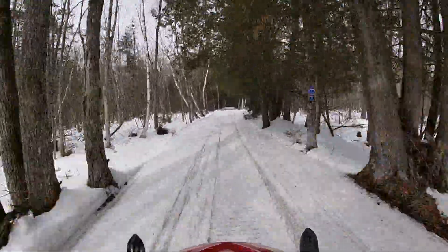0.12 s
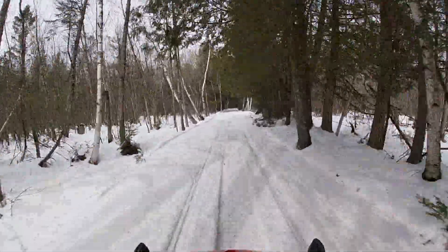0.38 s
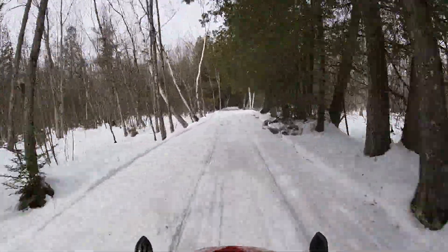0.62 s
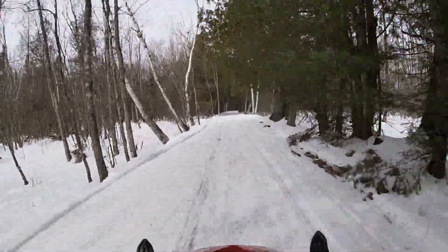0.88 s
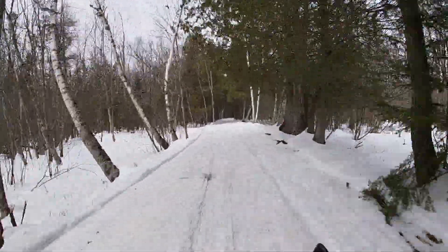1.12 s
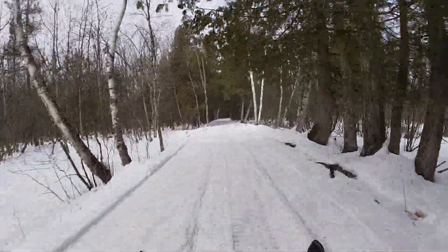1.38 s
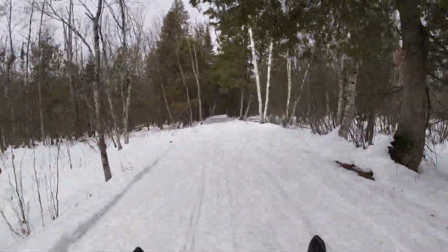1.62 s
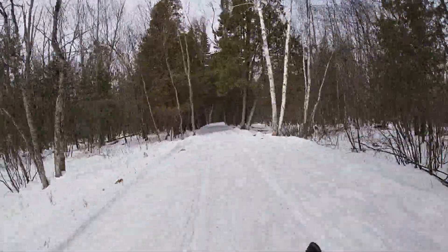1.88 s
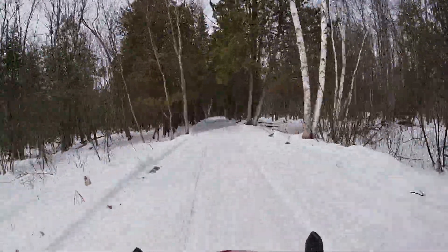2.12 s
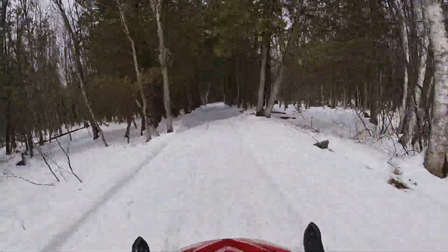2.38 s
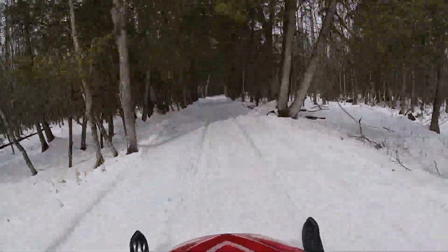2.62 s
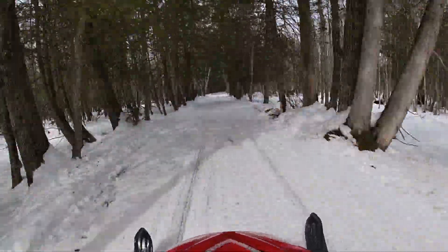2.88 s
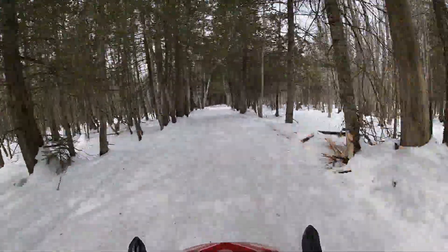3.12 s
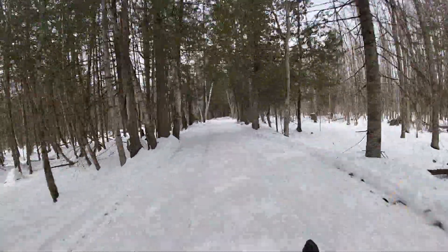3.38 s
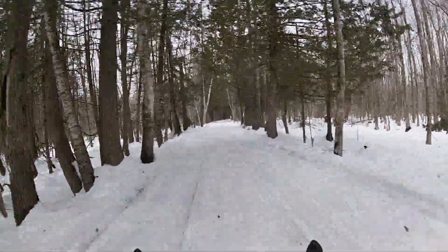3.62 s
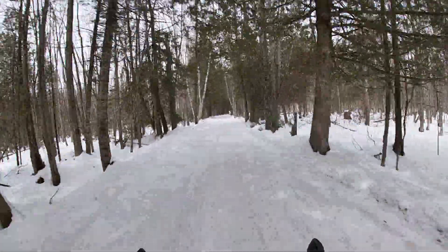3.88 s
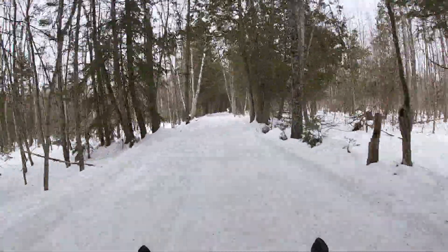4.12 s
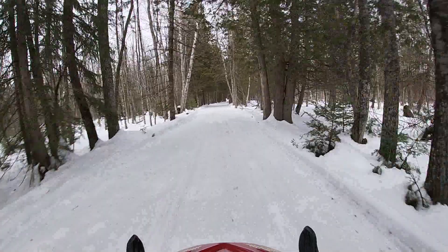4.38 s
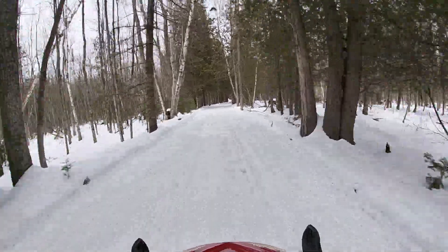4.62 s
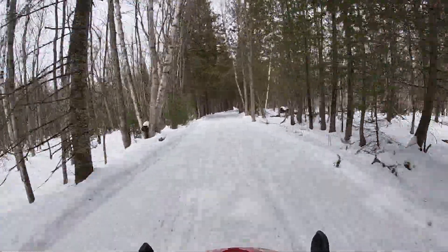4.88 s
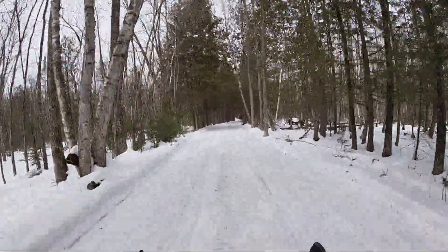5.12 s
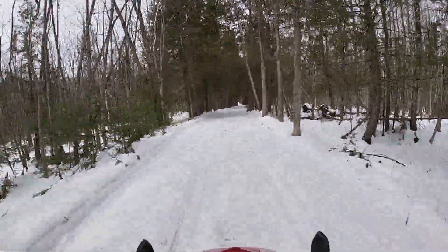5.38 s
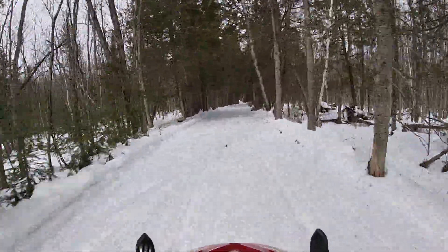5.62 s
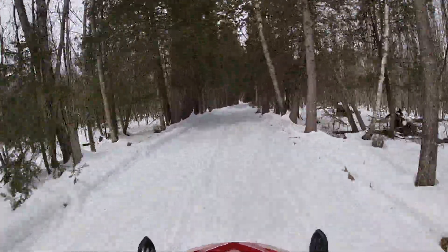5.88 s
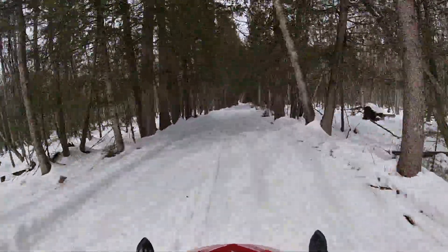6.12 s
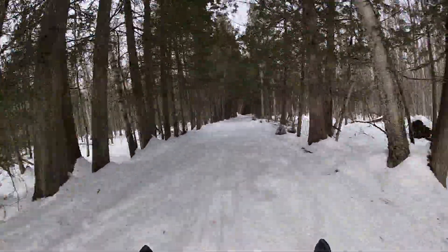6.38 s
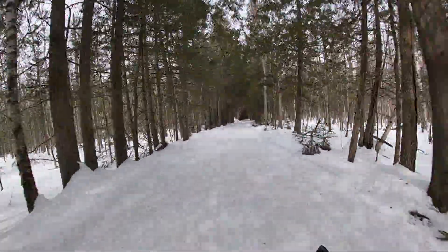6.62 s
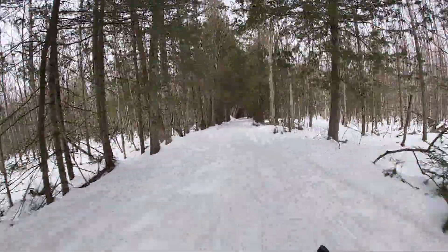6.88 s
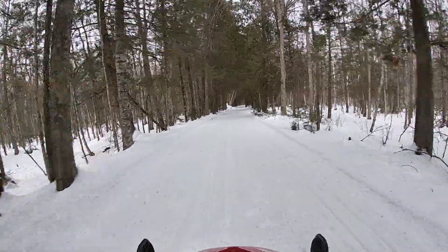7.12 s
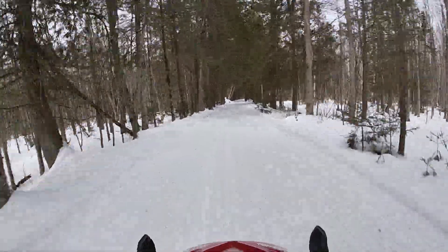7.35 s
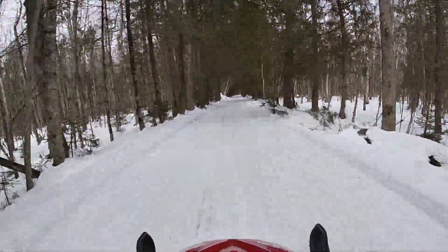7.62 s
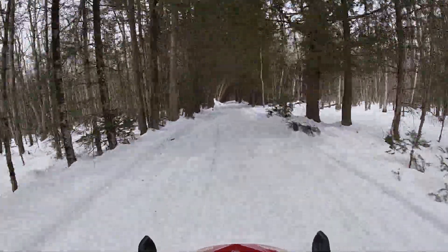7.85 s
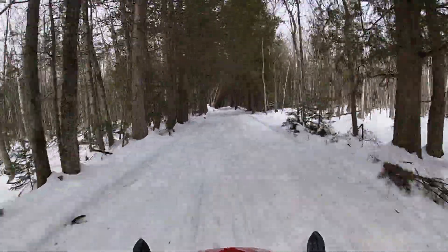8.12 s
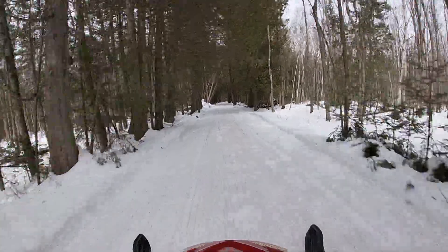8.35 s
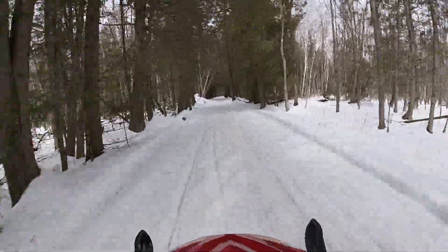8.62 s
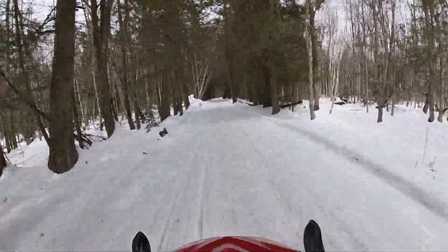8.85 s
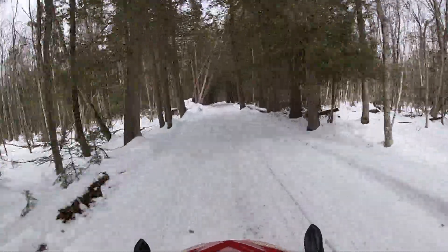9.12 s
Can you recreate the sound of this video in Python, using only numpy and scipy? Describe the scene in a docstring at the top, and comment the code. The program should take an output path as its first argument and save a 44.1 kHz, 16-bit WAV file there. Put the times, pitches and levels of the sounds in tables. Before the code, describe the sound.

Heard from the rider's helmet, a twin two-stroke snowmobile buzzes steadily through snowy woods, pitch easing up and down, sputtering briefly amid track roar and hiss.

```python
"""A droning exhaust that stumbles comes first to the ear: a twin two-stroke snowmobile on a snow trail.
One housed microphone rides at the driver's helmet, so the machine stays at the same close distance.
The exhaust is a sine at two firings a turn plus filtered pulses in which some firings come weak. Sines at
the crank orders sing through the hood's resonances, and a wavering sine is the hum of the track lugs.
Behind them, coloured noise makes the wind buffet, the roar of engine and track, and the hiss of intake and snow."""
import sys
import numpy as np
from scipy import signal
from scipy.fft import rfft, irfft, next_fast_len
from scipy.io import wavfile
from scipy.ndimage import uniform_filter1d, map_coordinates

SR = 44100
rng = np.random.default_rng(int(sys.argv[2]) if len(sys.argv) > 2 else 0)


def materialize(psi):
    """Save the field psi as 16-bit PCM at rate SR to the path in sys.argv[1].

    A 1-D psi becomes a single channel; in a 2-D psi each row is a channel.
    """
    bounded = np.clip(np.atleast_2d(psi).T, -1, 1)
    quanta = np.round(bounded * 32767).astype(np.int16)
    wavfile.write(sys.argv[1], SR, quanta)


def linear_from_db(decibels):
    """Turn decibels (scalar or array-like) into linear amplitude factors; 0 gives 1."""
    return 10 ** (np.asarray(decibels, float) / 20)


N = 407484  # samples

# Wind buffet at the microphone: [t/s, level/dB]
BUFFET_LEVEL = [(0.0, -31), (0.31, -21), (0.62, -32), (0.78, -23), (0.98, -35), (1.31, -24), (1.6, -27),
                (1.95, -31), (2.4, -21.5), (3.3, -31), (3.7, -23), (3.96, -25), (4.5, -23), (5.0, -31),
                (5.4, -20), (5.8, -33), (6.36, -23), (6.9, -28), (7.05, -19), (7.2, -21.5), (8.1, -25.5),
                (8.27, -33), (8.45, -31), (8.85, -34.5), (9.0, -28.5), (9.24, -26)]
# Engine and track roar, intake and snow hiss: [t/s, roar level/dB, hiss level/dB]
AIR_LEVEL = [(0.0, -19, -31), (0.75, -17.5, -30), (0.92, -18.5, -31), (1.14, -16, -27.5),
             (1.25, -16.5, -29), (1.6, -17, -30.5), (1.98, -18.5, -30.5), (2.2, -16.5, -28),
             (2.43, -16, -26), (2.75, -17, -29), (2.98, -17, -29), (3.2, -16.5, -30.5), (3.5, -19.5, -32),
             (3.96, -17.5, -31), (4.43, -17.5, -31.5), (5.0, -19.5, -32), (5.66, -19, -33), (6.1, -17, -31),
             (6.28, -16.5, -29), (6.5, -17, -29.5), (6.74, -18, -28), (7.05, -15, -27.5),
             (7.5, -16.5, -27.5), (8.1, -17.5, -30), (8.48, -19, -30), (8.68, -17, -30), (8.89, -19.5, -31),
             (9.24, -18, -31)]
# Relative spectra of the three noises: [f/Hz, level/dB]
BUFFET_SPECTRUM = [(12, -19), (25, -7.5), (40, -6.5), (65, -4.5), (110, -8), (200, -19.5), (400, -48.5),
                   (1000, -120)]
ROAR_SPECTRUM = [(40, -120), (80, -8.5), (130, 4.5), (200, 7), (250, -3), (296, -2.5), (355, -4),
                 (523, -4.5), (580, -7), (897, -11), (1120, -9), (1360, -14), (1550, -7), (2040, -20),
                 (2400, -23.5), (3120, -53), (5280, -120)]
HISS_SPECTRUM = [(500, -120), (1060, -0.5), (1800, 0.5), (2050, -4), (3000, -4), (4080, -12), (4620, -11),
                 (6040, -13.5), (7350, -25), (8000, -32), (9000, -31), (10000, -35.5), (11000, -44.5),
                 (12600, -51), (13000, -69.5), (14200, -68.5), (16000, -120)]
# Track lugs passing the sprocket: [t/s, lug rate f/Hz, level/dB]
TRACK_HUM = [(0.0, 243, -25), (0.3, 245, -21.5), (0.8, 244, -27), (1.13, 257, -26), (1.6, 243, -33),
             (1.96, 252, -27), (2.25, 255, -32), (2.45, 260, -24), (2.98, 263, -26.5), (3.3, 258, -32),
             (3.5, 260, -27.5), (3.9, 256, -28.5), (4.37, 250, -33.5), (4.63, 246, -22.5),
             (4.89, 247, -18.5), (5.07, 252, -23), (5.4, 244, -31.5), (5.68, 240, -24.5), (6.12, 245, -24),
             (6.27, 244, -27.5), (6.77, 250, -19), (7.0, 252, -28), (7.5, 255, -24.5), (7.85, 258, -29),
             (8.5, 252, -30.5), (8.93, 253, -18), (9.24, 255, -34)]
# Crank speed, in turns per second: [t/s, f/Hz]
CRANK_SPEED = [(0.0, 92.7), (0.2, 91), (0.44, 89.1), (0.67, 90.1), (0.82, 87.65), (0.97, 90.75),
               (1.1, 96.6), (1.2, 92.36), (1.31, 89.33), (1.49, 87.5), (1.7, 85.7), (1.88, 90.04),
               (2.06, 94.3), (2.16, 98), (2.34, 98.5), (2.44, 95.5), (2.6, 91.76), (2.7, 89.9),
               (2.96, 94.8), (3.04, 91.2), (3.22, 86.3), (3.33, 85.46), (3.6, 88.7), (3.73, 85.75),
               (3.86, 85.9), (4.0, 86.95), (4.17, 84.4), (4.4, 81.3), (4.72, 80.23), (4.99, 85.54),
               (5.35, 80.84), (5.51, 79.9), (5.64, 80.86), (5.79, 87.4), (5.93, 88.1), (6.1, 93.3),
               (6.29, 87.95), (6.41, 87.9), (6.59, 93), (6.77, 93.1), (7.0, 94), (7.23, 93), (7.3, 91.5),
               (7.54, 89.9), (7.95, 86.5), (8.12, 85.7), (8.2, 87.44), (8.44, 87.9), (8.6, 92.4),
               (8.67, 92.6), (9.01, 88.9), (9.24, 88.1)]
# Crank orders before resonance and effort: [order, level/dB]
ORDER_LEVEL = [(4, -33), (5, -44), (6, -33.5), (7, -40.5), (8, -42), (9, -45.5), (10, -46.5), (11, -43),
               (12, -42.5), (13, -40), (14, -44), (15, -46.5), (16, -45), (17, -41.5), (18, -41.5),
               (19, -46.5), (20, -45), (21, -48), (22, -52.5), (23, -51), (24, -45)]
# Resonances of hood and silencer: [centre f/Hz, width f/Hz, lift level/dB]
RESONANCES = [(330, 25, 4), (389.6, 25, 9.5), (471.3, 20, 9.5), (528, 50, 6), (655, 30, 5), (747, 110, 6.5),
              (981, 40, 5.5), (1067, 41, 7), (1150.4, 70, 10), (1265, 40, 6), (1452, 22, 4.5),
              (1527, 52, 13), (1552, 23, 3.5), (1684, 45, 10.5)]
# Level change of the whine: [t/s, lower part level/dB, upper part level/dB]
WHINE_LEVEL = [(0.0, 4, 0.5), (0.3, -1, 1), (0.75, 1, 4.5), (1.0, 1.5, 3), (1.4, -0.5, 1), (1.65, 2, -1),
               (1.9, -0.5, 3), (2.25, -1, -1), (2.65, 1, 3), (3.1, -0.5, 0), (3.5, 0, -0.5),
               (3.95, 0.5, 0.5), (4.3, 5, 1), (4.7, 2.5, 2.5), (5.05, 1, -1), (5.3, 4, 3.5), (5.65, -2, 3),
               (6.2, 0, -0.5), (6.6, -0.5, 4.5), (7.0, -1, 0), (7.5, -0.5, 0), (8.0, 0.5, 1),
               (8.5, 1.5, -1), (8.7, -3, 0), (9.0, -2, 1.5), (9.24, -1, 0.5)]
# First crank order of the lower and of the upper part of the whine: [order]
WHINE_FIRST_ORDER = (11, 15)
# Even firing tone between stumbles: [t/s, level/dB]
EXHAUST_LEVEL = [(0.0, -12), (0.35, -10.5), (0.7, -13.5), (0.9, -10), (1.08, -11), (1.13, -15.5),
                 (1.28, -15.5), (1.45, -9.5), (2.02, -11), (2.08, -17), (2.22, -14.5), (2.38, -18),
                 (2.6, -13.5), (2.68, -11), (3.1, -11), (3.3, -9.5), (3.6, -12), (3.95, -13), (4.15, -13),
                 (4.85, -14), (5.05, -10), (5.25, -12), (5.75, -11), (6.15, -13.5), (6.92, -12.5),
                 (7.0, -17), (7.19, -17.5), (7.25, -12.5), (7.9, -12), (8.35, -9.5), (8.75, -11.5),
                 (9.24, -11)]
# Relative colour of an uneven firing in the pipe: [f/Hz, level/dB]
PIPE_SPECTRUM = [(30, -41.5), (62, -3.5), (105, 6), (140, -10.5), (200, -15.5), (240, -16), (300, -26),
                 (420, -61), (900, -120)]
# Stumbles as the throttle eases, timed at half height: [start t/s, length t/s, level/dB]
STUMBLES = [(0.713, 0.12, -19), (1.106, 0.13, -22), (1.414, 0.06, -26), (1.545, 0.23, -15.5),
            (2.05, 0.062, -25), (2.363, 0.34, -25), (2.921, 0.25, -24), (3.247, 0.078, -16.5),
            (3.605, 0.24, -19), (4.128, 0.056, -17.5), (4.247, 0.17, -20.5), (4.417, 0.4, -17.5),
            (5.097, 0.093, -19.5), (5.288, 0.34, -17), (6.05, 0.07, -30), (6.219, 0.17, -17),
            (6.572, 0.066, -23), (7.573, 0.21, -25.5), (7.899, 0.13, -24.5), (8.122, 0.077, -22),
            (8.7, 0.14, -28)]

STUMBLE_EDGE_S, STEADY_UNEVEN_DB = 0.044, -36  # rise and fall; unevenness in steady running
STUMBLE_FULL_DB, TONE_LOSS = -12.5, 0.74  # stumble level at which the tone loses this share
OVERTONE_LOSS = 0.35  # share of the tone's loss in dB that the orders suffer
PULL_DB, PULL_HZ_PER_S = 1.5, 18  # swell of the low orders; speed gain at which it levels off


def unit(x):
    """Scale a signal to rms 1."""
    return x / np.sqrt(np.mean(x ** 2) + 1e-20)


def curves(rows):
    """Draw one value per sample for each column after the time."""
    knot_s, *columns = np.transpose(rows)
    t = np.arange(N) / SR
    return [np.interp(t, knot_s, column) for column in columns]


def wobble(rate):
    """Random curve with straight lines between knots, rate (at most 50) knots a second."""
    knots = rng.standard_normal(int(N * 60 / SR))
    return map_coordinates(knots, [np.arange(N) * min(rate, 50) / SR], order=1)


def coloured(x, spectrum):
    """Filter x through a spectrum, then bring it to rms 1."""
    size = next_fast_len(N + 8192)
    hz, db = np.transpose(spectrum)
    bin_hz = np.fft.rfftfreq(size, 1 / SR)
    gain = linear_from_db(np.interp(np.log(bin_hz + 1), np.log(hz + 1), db))
    return unit(irfft(rfft(x, size) * gain, size)[:N])


def patchy_noise(patchy_db):
    """White noise whose gain varies at random in patches of time and frequency."""
    cells = signal.stft(rng.standard_normal(N), nperseg=512)[2]
    patches = uniform_filter1d(rng.standard_normal(cells.shape), size=8, axis=0)
    patches = uniform_filter1d(patches, size=8, axis=1)
    return signal.istft(cells * linear_from_db(patchy_db * unit(patches)), nperseg=512)[1][:N]


def tone(turns, order):
    """A sine of rms 1 locked to a shaft, from a random phase."""
    return np.sqrt(2) * np.sin(2 * np.pi * (order * turns + rng.random()))


def wind_buffet():
    """Wind against the housed microphone: low noise that swells in gusts."""
    level_db, = curves(BUFFET_LEVEL)
    return linear_from_db(level_db) * coloured(patchy_noise(patchy_db=0.4), BUFFET_SPECTRUM)


def engine_track_roar(level_db):
    """The broad roar of engine and track, as one noise."""
    return linear_from_db(level_db) * coloured(patchy_noise(patchy_db=0.5), ROAR_SPECTRUM)


def intake_snow_hiss(level_db, turns):
    """Hiss of intake and thrown snow, breathing once and twice a crank turn."""
    puff = 1 + 0.019 * np.cos(2 * np.pi * turns) + 0.04 * np.cos(4 * np.pi * turns)
    gusts = linear_from_db(0.52 * wobble(11) + 0.83 * wobble(35))
    noise = coloured(patchy_noise(patchy_db=0.28), HISS_SPECTRUM)
    return linear_from_db(level_db) * gusts * puff * noise


def track_hum():
    """Drive lugs pass the sprocket at a rate set by ground speed; the hum wavers over the bumps."""
    lug_hz, level_db = curves(TRACK_HUM)
    lugs_passed = np.cumsum(lug_hz + 3.5 * wobble(12)) / SR
    return linear_from_db(level_db + 3.1 * wobble(14)) * tone(lugs_passed, order=1)


def stumbling():
    """Strength of the uneven firing: trapezoids on top of a low steady value."""
    t = np.arange(N) / SR
    strength = linear_from_db(STEADY_UNEVEN_DB)
    for start, length, db in STUMBLES:
        inside_s = np.minimum(t - start, start + length - t)  # time to the nearer edge
        strength = strength + linear_from_db(db) * np.clip(inside_s / STUMBLE_EDGE_S + 0.5, 0, 1)
    return strength


def kept(stumble):
    """Share of the even firing that survives a stumble."""
    return np.clip(1 - TONE_LOSS * stumble / linear_from_db(STUMBLE_FULL_DB), 0.1, 1)


def crank_overtones(crank_hz, turns, stumble):
    """Crank orders, each flickering on its own; they swell as they cross a resonance."""
    shaky_turns = turns + 0.004 * wobble(30)  # small waver of phase, shared by all orders
    effort = np.log10(crank_hz / crank_hz.mean())  # harder running sharpens every firing
    speed_gain = uniform_filter1d(np.gradient(crank_hz) * SR, size=4410)  # Hz per second
    pull_db = PULL_DB * np.tanh(speed_gain / PULL_HZ_PER_S)
    part_db = [pull_db, *curves(WHINE_LEVEL)]  # low orders, lower whine, upper whine
    sound = 0
    for order, db in ORDER_LEVEL:
        lift_db = 0
        for centre, width, lift in RESONANCES:
            lift_db = lift_db + lift / (1 + (2 * (order * crank_hz - centre) / width) ** 2)
        effort_db = (9 + 1.8 * order) * effort  # the high orders gain most
        part = np.searchsorted(WHINE_FIRST_ORDER, order, "right")
        flicker_db = 1.0 * wobble(6) + 1.6 * wobble(30)
        level_db = db + lift_db + effort_db + part_db[part] + flicker_db
        sound += linear_from_db(level_db) * tone(shaky_turns, order)
    return sound * kept(stumble) ** OVERTONE_LOSS


def uneven_firing(turns):
    """Burnt gas builds up until a fouled charge barely burns and clears the cylinder."""
    at = np.flatnonzero(np.diff(np.floor(2 * turns)))  # samples at which a cylinder fires
    # about three firings in eight come weak
    build_up = 0.378 + 0.012 * rng.standard_normal(len(at))
    weak = np.diff(np.floor(np.cumsum(build_up)), prepend=0)
    pulses = np.zeros(N)
    pulses[at] = weak.mean() - weak + 0.12 * rng.standard_normal(len(at))
    return coloured(pulses, PIPE_SPECTRUM)


def exhaust(turns, stumble):
    """The even tone at two firings a turn, sagging while the uneven firing comes up."""
    tone_db, = curves(EXHAUST_LEVEL)
    even = kept(stumble) * linear_from_db(tone_db + 0.79 * wobble(30)) * tone(turns, order=2)
    uneven = stumble * linear_from_db(0.5 * wobble(18)) * uneven_firing(turns)
    return even + uneven


def scene():
    """All sources at the one helmet microphone, background first."""
    crank_hz, = curves(CRANK_SPEED)
    turns = np.cumsum(crank_hz) / SR
    stumble = stumbling()
    roar_db, hiss_db = curves(AIR_LEVEL)
    mix = wind_buffet() + engine_track_roar(roar_db) + intake_snow_hiss(hiss_db, turns)
    mix = mix + track_hum()
    mix = mix + crank_overtones(crank_hz, turns, stumble)
    mix = mix + exhaust(turns, stumble)
    return mix[None]


def top_cut(x):
    """Nothing passes above the cut-off."""
    return signal.sosfilt(signal.butter(12, 14250, fs=SR, output="sos"), x)


def record(dry):
    """The microphone's input stage rounds off the peaks, bending toward a ceiling of 0.93."""
    ceiling, hardness = 0.93, 3.0
    soft = dry / (1 + np.abs(dry / ceiling) ** hardness) ** (1 / hardness)
    return top_cut(soft)


dry = scene()
out = record(dry)
materialize(out)
```